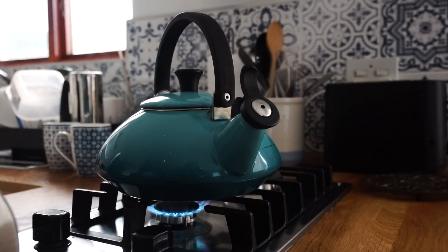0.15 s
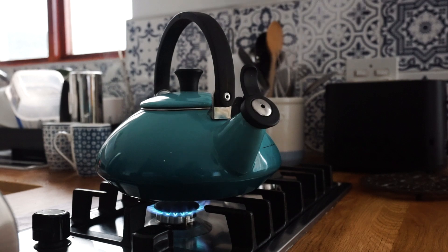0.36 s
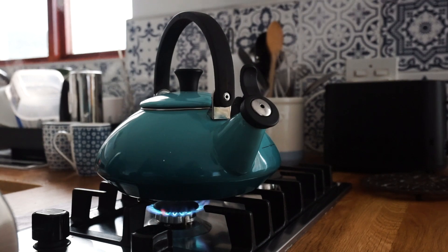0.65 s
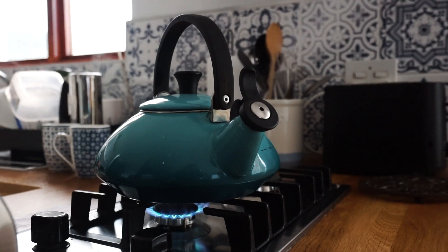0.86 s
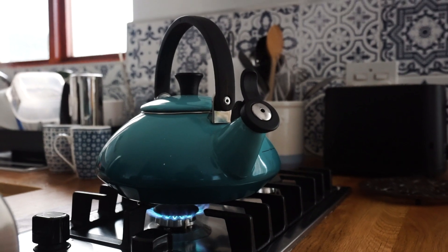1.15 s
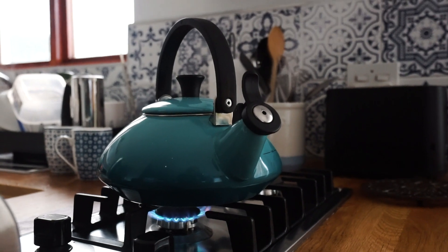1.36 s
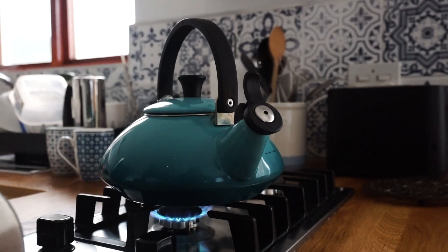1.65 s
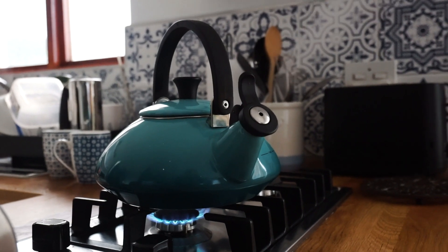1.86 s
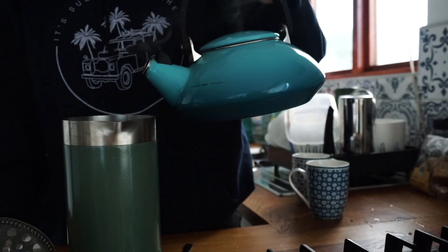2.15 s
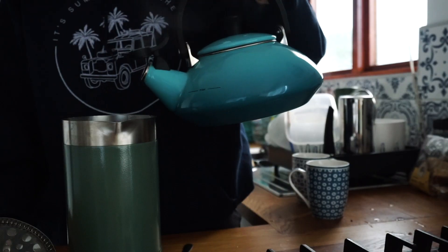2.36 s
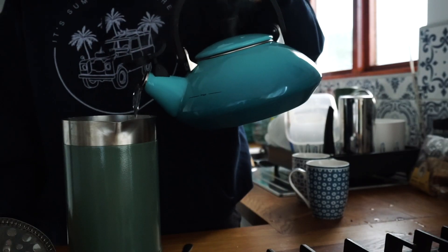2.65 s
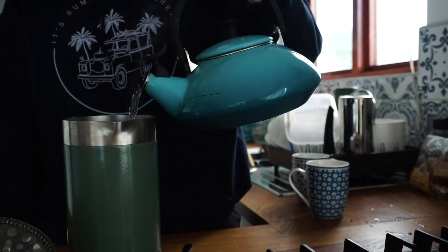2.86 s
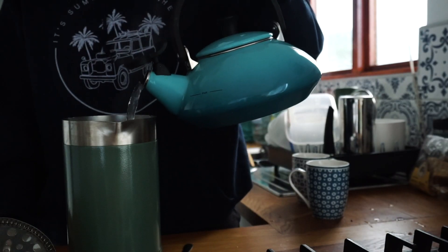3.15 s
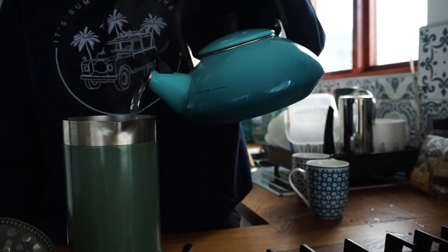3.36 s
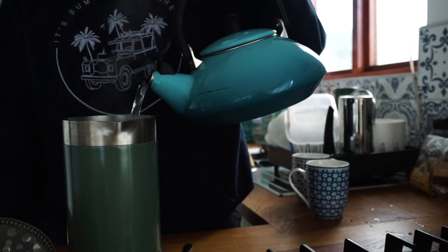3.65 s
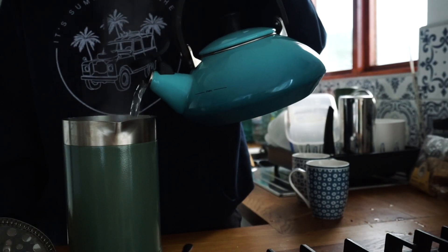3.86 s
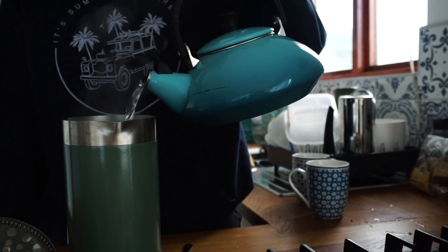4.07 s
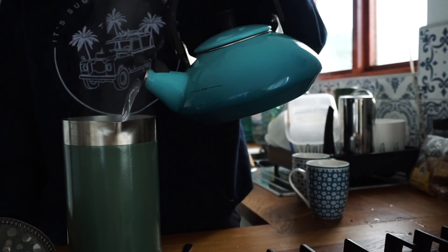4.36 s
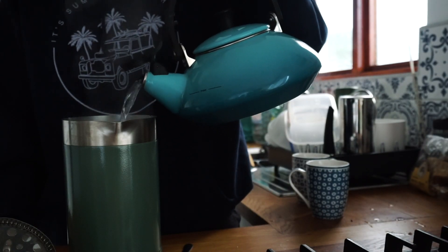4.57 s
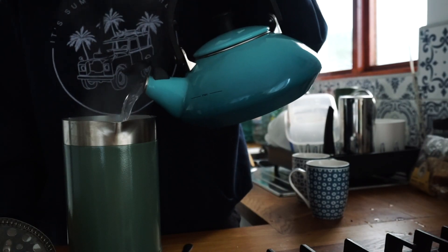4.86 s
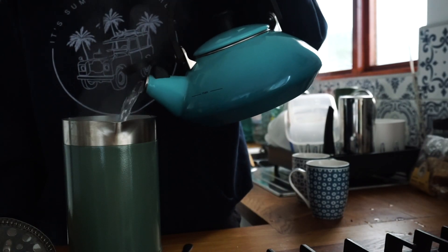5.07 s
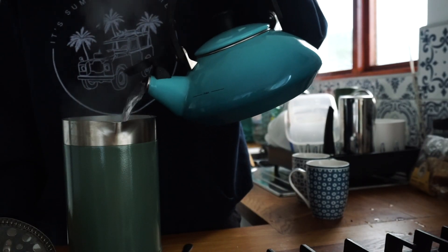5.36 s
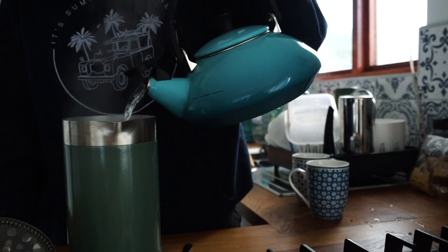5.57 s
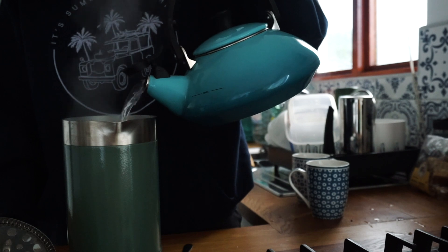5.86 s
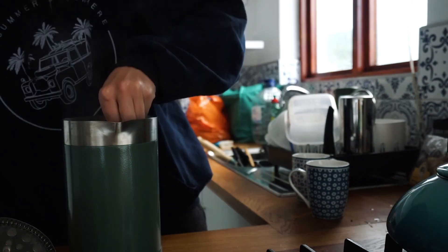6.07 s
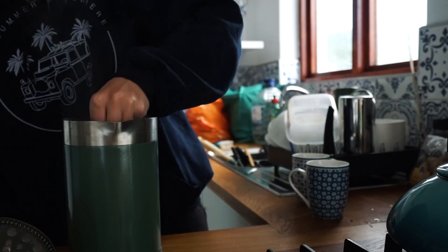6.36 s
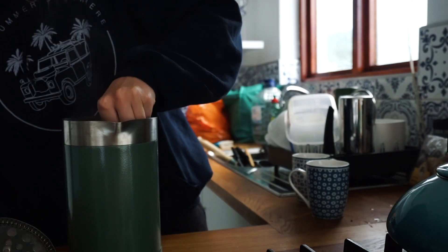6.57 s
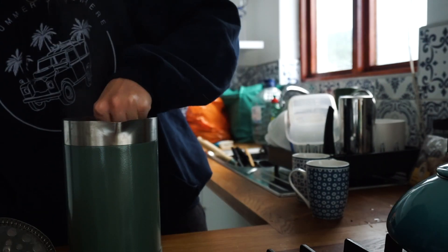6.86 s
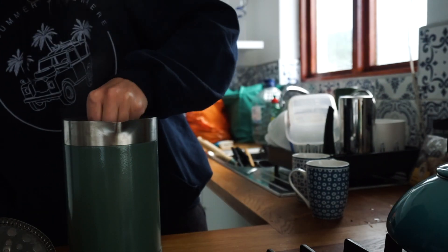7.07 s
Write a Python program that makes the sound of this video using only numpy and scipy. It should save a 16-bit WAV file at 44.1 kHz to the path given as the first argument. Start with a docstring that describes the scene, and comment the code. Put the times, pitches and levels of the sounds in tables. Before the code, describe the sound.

Wavering kettle whistle over steam hiss, turning to a shriek and cutting off, then glugging hot water into a metal flask and sharp stopper clicks.

```python
"""A stovetop kettle whistles over its boil in a tiled kitchen: a wavering jet tone with overtones, over steam hiss.
A second mode breaks in, and its mixing tones with the first make a rough shriek, until the pressure dies.
Hot water then gushes into a steel flask: showers of bubbles, glugs and slaps, coloured by its air column.
Last, the flask's stopper is worked in with sharp clicks, scrapes and dull thuds that ring the steel.
Faint rain, shaped stereo noise, hisses outside throughout."""
import sys
import numpy as np
from scipy import signal
from scipy.fft import rfft, irfft, next_fast_len
from scipy.io import wavfile
from scipy.ndimage import map_coordinates

SR = 44100
rng = np.random.default_rng(int(sys.argv[2]) if len(sys.argv) > 2 else 0)


def generate_wav(sig):
    """Save sig (samples, or channels by samples) to the path in sys.argv[1] as 16-bit PCM at SR."""
    pcm = np.round(np.clip(np.atleast_2d(sig).T, -1, 1) * 32767).astype(np.int16)
    wavfile.write(sys.argv[1], SR, pcm)


N = 318843

# the whistle's first mode, before its random flutter: time_s, pitch_hz
WHISTLE_PITCH = [(0.0, 1330), (0.04, 1376), (0.2, 1255), (0.26, 1308), (0.36, 1270), (0.54, 1260),
                 (0.66, 1310), (0.72, 1266), (0.77, 1338), (0.84, 1320), (0.92, 1271), (1.02, 1283),
                 (1.09, 1401), (1.2, 1345), (1.33, 1352), (1.45, 1397), (1.52, 1364), (1.68, 1437),
                 (1.82, 1490), (1.94, 1482), (2.04, 1457), (2.06, 1408), (2.2, 1379), (2.24, 1310),
                 (2.34, 1367), (2.58, 1397)]
# the kettle's place between the ears: frequency_hz, left_minus_right_db
KETTLE_SIDES = [(300, 0.5), (1300, -3), (2600, -7.5), (4000, -10), (8000, -4), (14000, -13.5)]
# the pour's two main layers: time_s, gurgle_db, splash_db
POUR_LEVELS = [(2.83, -54.5, -60.5), (2.95, -57, -58.5), (3.07, -59, -60), (3.27, -48.5, -51.5),
               (3.49, -62, -53), (3.75, -68.5, -54.5), (4.07, -63, -54.5), (4.25, -55.5, -49),
               (4.41, -52.5, -50.5), (4.57, -51, -46), (5.47, -47.5, -47.5), (5.67, -52.5, -52),
               (6.0, -42.5, -48.5)]
# resonances of the dry steel wall: pitch_hz, width_hz, level_db
DRY_WALL = [(3140, 130, 2), (3180, 69, -1)]

TOP_HZ = 16150  # upper band limit
WHISTLE_END, POUR_START, POUR_END = 2.574, 2.8, 6.015  # s
REST_HZ = 1305.4  # the pitch at an ordinary boil; a harder jet blows sharper
WALL_FADE_DB_PER_S = 27.5  # the wall's ring fades as the water covers it


def amp(db):
    """Decibels to gain."""
    return 10 ** (np.asarray(db) / 20)


def unit(x):
    """x at rms 1."""
    return x / np.sqrt(np.mean(x ** 2) + 1e-20)


def clock(size=N):
    """Seconds at each sample."""
    return np.arange(size) / SR


def along(points, hz):
    """Interpolate (Hz, value) points on a log frequency axis."""
    f, v = np.transpose(points)
    return np.interp(np.log(hz + 1), np.log(f + 1), v)


def curves(rows):
    """One value per sample for each column after the time."""
    s, *cols = np.transpose(rows)
    return [np.interp(clock(), s, c) for c in cols]


def between(start, end, edge):
    """1 from start to end, with ramps edge seconds long centred on both."""
    return np.clip(np.minimum(clock() - start, end - clock()) / edge + .5, 0, 1)


def swell(s, half):
    """A smooth bump of height 1 at s seconds, down to 1/e at half seconds either side."""
    return np.exp(-np.minimum(((clock() - s) / half) ** 2, 50))


def wobble(rate):
    """A smooth random curve, rate knots a second."""
    return map_coordinates(rng.standard_normal(int(N * rate / SR) + 4), [clock() * rate])


def add(track, s, sound):
    """Mix a sound into a track at s seconds."""
    part = track[..., round(s * SR):][..., :sound.shape[-1]]
    part += sound[..., :part.shape[-1]]


def filtered(x, response):
    """x through a complex response, a function of frequency."""
    size = x.shape[-1]
    m = 2 * next_fast_len(size // 2 + 4096)  # even, with room for the filter's tail
    return irfft(rfft(x, m) * response(np.fft.rfftfreq(m, 1 / SR)), m)[..., :size]


def colour(x, spectrum):
    """A causal (minimum-phase) filter through the given (Hz, dB) points."""
    def response(hz):
        # folding the cepstrum onto positive time gives the minimum phase
        cepstrum = irfft(np.log(amp(along(spectrum, hz))))
        cepstrum[1:] *= 2
        cepstrum[len(hz) - 1:] = 0
        return np.exp(rfft(cepstrum))
    return filtered(x, response)


def resonate(x, modes):
    """x through parallel (Hz, width Hz, dB) resonances of alternating sign."""
    def response(f):
        return sum((-1) ** k * amp(db) * 1j * f * width / (centre * centre - f * f + 1j * f * width)
                   for k, (centre, width, db) in enumerate(modes))
    return filtered(x, response)


def diffuse(size=N):
    """Stereo white noise from all around: alike in the bass, far less so in the treble."""
    # frequency_hz, left_right_likeness
    likeness = [(150, 0.98), (500, 0.82), (1200, 0.36), (3000, 0.094), (8000, 0.28)]

    def mid_side(hz):
        turn = np.arccos(np.clip(along(likeness, hz), -1, 1)) / 2
        return np.array([np.cos(turn), np.sin(turn)])
    mid, side = filtered(rng.standard_normal((2, size)), mid_side)
    return np.array([mid + side, mid - side])


def kitchen(x, wet_db, pan=((1000, 0),), lead=.00002, send=None):
    """Direct sound, panned and lead seconds earlier on the left, plus a tiled room's tail (fed by send, if given)."""
    # the room's decay: frequency_hz, t60_s
    decay = [(150, 0.29), (600, 0.51), (2500, 0.44), (6000, 0.43), (15000, 0.21)]
    hz, t, z = signal.stft(diffuse(size=SR // 2), SR, nperseg=256)
    tail = signal.istft(z * amp(-60 * t / along(decay, hz)[:, None]), SR, nperseg=256)[1]
    # the nearest walls answer after a few ms
    tail = tail * np.clip(clock(size=tail.shape[1]) / 0.0026 - .5, 0, 1)
    source = x if send is None else send
    wet = signal.fftconvolve(source[None], tail / np.linalg.norm(tail[0]), axes=1)[:, :len(x)]
    sides = np.array([[.5], [-.5]])  # left, right
    direct = filtered(x, lambda hz: amp(sides * along(pan, hz)) * np.exp(2j * np.pi * hz * sides * lead))
    return (direct + amp(wet_db) * wet) / np.hypot(1, amp(wet_db))


def burst(t60):
    """Half a second holding one dying puff of noise."""
    t = clock(size=SR // 2)
    return rng.standard_normal(len(t)) * amp(-60 * t / t60)


def phase_of(hz, jitter):
    """The phase of a tone whose pitch is roughened by fast random jitter."""
    return 2 * np.pi * np.cumsum(hz * (1 + jitter * wobble(900))) / SR


def rain():
    """Rain outside and the low murmur of the house: shaped diffuse noise at a nearly steady level."""
    # frequency_hz, density_db
    rain_colour = [(15, -50), (25, -27.5), (108, -16.5), (141, -11), (206, -19.5), (229, -16.5),
                   (301, -13.5), (416, -25.5), (575, -20.5), (754, -15.5), (1020, -34.5), (1700, -23),
                   (2000, -27.5), (3200, -32), (13200, -37.5), (16000, -41)]
    return amp(-60.0 + 0.43 * wobble(3.3)) * unit(colour(diffuse(), rain_colour))


def crack(blow, treble_db):
    """A blow in the stopper's colour, always with the same energy."""
    # frequency_hz, density_db
    click_colour = [(40, -38), (90, -18), (135, -10), (270, -15.5), (480, -14.5), (570, -0.5), (830, -9.5),
                    (1350, -5.5), (1700, -0.5), (2080, -2), (2300, -2.5), (2750, -3), (3050, -4),
                    (3400, -7), (4000, -10), (6000, -12.5), (12000, -17.5), (16000, -25)]
    sound = colour(colour(blow, click_colour), [(3000, 0), (7000, treble_db)])
    return sound / np.sqrt(np.sum(sound ** 2) / (SR * 0.00086))


def ringing(modes, scatter_db):
    """Half a second of dying modes; every blow shares its force among them differently."""
    t = clock(size=SR // 2)
    return sum(amp(db + scatter_db * rng.standard_normal() - 60 * t / t60) * np.sin(2 * np.pi * hz * t)
               for hz, db, t60 in modes)


def scrapes():
    """The stopper's thread slips in tiny random jerks, which ring the neck."""
    # scrapes between clicks: time_s, half_length_s, level_db, pitch_hz
    scrape_rows = [(6.395, .016, -49, 1900), (6.462, .014, -45, 2360), (6.71, .02, -58, 1680),
                   (6.872, .025, -48, 2320), (7.12, .013, -48, 1660)]
    out = np.zeros(N)
    for s, half, db, hz in scrape_rows:
        slips = rng.standard_normal(N) * (rng.random(N) < 700 / SR)  # about 700 a second
        out += amp(db) * swell(s, half) * unit(resonate(slips, [(hz, 260, 0), (1100, 400, -9)]))
    return kitchen(out, wet_db=-4.0, lead=.00006)


def stopper():
    """Clicks crack, rattle and ring the stopper, flask and room; thuds add a puff and a trapped-air note."""
    # time_s, level_db, low_ring_hz, low_ring_db, high_ring_hz, high_ring_db, knock_db, treble_db
    click_rows = [(6.1836, -14.5, 1700, -22, 3360, -8.5, -0.5, 1.5),
                  (6.4186, -10.5, 1520, -19, 2420, -10, 0.5, -2.5),
                  (6.6301, -13, 1650, -19, 2850, -10, 1, -0.5),
                  (6.7977, -8, 1730, -22.5, 2290, -10, 1, 0.5),
                  (6.9494, -9.5, 1780, -10, 3600, -9, -6, 2.5),
                  (7.1346, -12, 1820, -2.5, 2600, -22.5, 1.5, 3)]
    # time_s, level_db, hollow_pitch_hz
    thud_rows = [(6.5, -18.5, 500), (6.597, -36.5, 596), (6.897, -21, 590), (7.05, -34, 576)]
    # frequency_hz, density_db
    thud_colour = [(60, -28), (120, -22), (300, -11), (450, -6.5), (580, 4.5), (750, -15), (1050, -6.5),
                   (1500, -14.5), (2500, -20), (5000, -38.5)]
    # the flask's hollow knock, before each click's knock_db: pitch_hz, level_db, t60_s
    knock_modes = [(135.3, -36.5, 0.54), (210.2, -35.5, 0.76), (562, -22, .12), (592, -23, 0.123)]
    # the flask's steel wall, before its common level: pitch_hz, level_db, t60_s
    steel_modes = [(1000, -6, .44), (1340, -8, 0.21), (1647, 3, .28), (1765, -2, 0.19), (1900, -1, .3),
                   (2310, -1.5, 0.3), (2390, -4, .33), (2570, -0.5, .33), (2690, -1, 0.4), (2789, -6, .3),
                   (3450, -16, 0.27), (4150, -15, .26)]
    steel_db, ring_t60 = -29, 0.017  # the steel's long ring; the stopper's short one (s)
    bounce_s, bounce_db = 0.0075, -6.5  # a second landing; its delay varies from click to click
    thud_ring_db, thud_t60 = -8.5, .08  # the trapped air's note (s)
    out, t = np.zeros((2, N)), clock(size=SR // 2)
    for s, db, low_hz, low_db, high_hz, high_db, knock_db, treble_db in click_rows:
        contact = 3.8 * (t == 0)
        snap = contact + burst(t60=0.013) + 0.3 * burst(t60=0.24)
        add(snap, bounce_s * rng.uniform(0.65, 1.3), amp(bounce_db) * burst(t60=0.018))
        ring = ringing([(low_hz, low_db, ring_t60), (high_hz, high_db, ring_t60)], scatter_db=-0.5)
        flask = amp(knock_db) * ringing(knock_modes, scatter_db=4.0)
        flask = flask + amp(steel_db) * ringing(steel_modes, scatter_db=2.5)
        flask = flask * (1 - np.exp(-t / 0.00208))  # the heavy flask takes a moment to swing
        # the room answers the first sharp contact and the stopper's ring; the rattle is heard only directly
        room_feed = crack(contact, treble_db) + ring
        click = kitchen(crack(snap, treble_db) + ring, wet_db=-3.5, pan=[(600, 0.0), (7000, -6.0)],
                        lead=.00007, send=room_feed)
        add(out, s, amp(db) * click)
        add(out, s, amp(db) * kitchen(flask, wet_db=-7.0, lead=.00006))
    for s, db, hz in thud_rows:
        thud = colour(burst(t60=0.084) * (1 - np.exp(-t / 0.0014)), thud_colour)
        note = amp(thud_ring_db - 60 * t / thud_t60) * np.sin(2 * np.pi * hz * t)
        thud = thud / abs(thud).max() + note * (1 - np.exp(-t / 0.0028))
        add(out, s, amp(db) * kitchen(thud, wet_db=-5.0, lead=.00006))
    return out + scrapes()


def bubbles(rate, hz, spread, cycles, size_db, rise):
    """A steady shower of bubbles at rms 1, each a damped sine that rises in pitch."""
    count = int(rate * N / SR)
    start = rng.integers(0, N, count)
    pitch = np.minimum(hz * np.exp(spread * rng.standard_normal((count, 1))), TOP_HZ)
    gain = amp(size_db * np.minimum(rng.exponential(size=(count, 1)), 4))
    turns = pitch * clock(size=int(2 * cycles * SR / hz))
    age = turns / cycles
    rings = gain * np.sin(2 * np.pi * turns * (1 + rise * age / 2)) * amp(-40 * age)
    places = start[:, None] + np.arange(turns.shape[1])
    return unit(np.bincount(places.ravel(), rings.ravel(), N)[:N])


def air_column(x, modes):
    """x twice through the flask's air, for steep flanks; the pitch sways as the surface sloshes."""
    sway = 0.041  # share by which sloshing detunes the air

    def tuned(ratio):
        shifted = [(hz * ratio, width, db) for hz, width, db in modes]
        return resonate(resonate(x, shifted), shifted)
    slosh = np.clip(.5 + .5 * wobble(22), 0, 1)
    return (1 - slosh) * tuned(1 - sway) + slosh * tuned(1 + sway)


def hollow():
    """The empty flask's air sings on under the thin first stream, detuned by sloshing."""
    # time_s, level_db
    hollow_level = [(2.8, -74), (2.87, -59), (3.08, -57), (3.23, -48.5), (3.4, -51.5), (3.5, -57.5),
                    (3.66, -57), (3.8, -66), (3.88, -59.5), (4.15, -68), (4.3, -90)]
    level_db, = curves(hollow_level)
    note = np.sin(phase_of(421 * (1 + 0.0393 * wobble(70)), jitter=0.069))
    return amp(level_db + 1.9 * wobble(55)) * unit(note)


def spray_level(splash_db):
    """Fine spray in dB: it follows the splashing, grows as the water nears the mouth and flares at spatters."""
    # the stream breaks up and spatters: time_s, half_length_s, extra_spray_db
    spatter_rows = [(2.835, 0.049, 6.5), (3.443, 0.16, 9.5), (4.777, 0.025, 5), (5.104, .015, 9.5),
                    (5.247, .03, 7.5), (5.407, 0.034, 6), (5.486, 0.019, 9), (5.91, 0.018, 2)]
    flares = sum(db * swell(s, half) for s, half, db in spatter_rows)
    follow = 0.18 * (splash_db - np.mean(POUR_LEVELS, axis=0)[2])  # dB per dB of splash
    growth = 1.5 * (clock() - (POUR_START + POUR_END) / 2)  # 1.5 dB a second
    return -61 + follow + growth + flares


def spurts():
    """Lumps of water slap the flask and ring its air, and at first its dry wall."""
    # time_s, level_db, treble_db
    spurt_rows = [(2.8058, -43.5, -10), (2.8395, -38, -10), (2.909, -42.5, -33.5), (2.936, -39.5, -24),
                  (2.983, -43, -27), (3.053, -51, -11.5), (3.455, -33.5, -11.5), (3.8705, -38, -5),
                  (4.3792, -38, -11), (4.4343, -34, -21), (4.5198, -41, -31), (4.5559, -33, -34),
                  (4.6225, -29, -26), (4.6874, -32.5, -19), (4.8316, -19.5, -33), (4.886, -42, -23.5),
                  (4.9546, -32, -19), (4.9976, -34, -6), (5.0542, -32.5, -11.5), (5.281, -30, -14.5),
                  (5.3398, -30, 7.5), (5.429, -33.5, -25), (5.571, -31.5, -4), (5.7319, -31.5, -13.5),
                  (5.739, -24.5, -4.5), (5.805, -35.5, -24), (5.9044, -34, -2)]
    # upper air modes of the flask: pitch_hz, width_hz, level_db
    slap_modes = [(1310, 72, 1), (1490, 43, 0), (1994, 110, -7), (2383, 55, 1.5)]
    out = np.zeros(N)
    for s, db, treble_db in spurt_rows:
        slap_colour = [(400, -14.0), (1300, 2.0), (2800, 1.0), (4500, treble_db + 9.0), (16000, treble_db)]
        slap = colour(burst(t60=0.062), slap_colour)
        dry_db = 15.0 - WALL_FADE_DB_PER_S * (s - POUR_START)
        slap = slap + amp(10.5) * resonate(slap, slap_modes) + amp(dry_db) * resonate(slap, DRY_WALL)
        add(out, s, amp(db) * slap / abs(slap).max())
    return out


def glugs():
    """Big bubbles pinch off one by one, each a short note that bends upward."""
    # time_s, level_db, starting_pitch_hz
    glug_rows = [(4.177, -41, 439), (4.242, -41, 430), (4.384, -42.5, 420), (4.493, -38.5, 483),
                 (4.522, -33.5, 450), (4.557, -32, 474), (4.592, -32.5, 450), (4.62, -34.5, 503),
                 (4.649, -38, 470), (4.689, -42, 428), (4.745, -35, 506), (4.772, -35.5, 444),
                 (4.808, -30, 488), (4.837, -42, 433), (4.864, -35, 460), (4.89, -30, 450),
                 (4.924, -36.5, 470), (4.971, -38, 545), (5.008, -30.5, 473), (5.035, -30.5, 474),
                 (5.069, -36, 473), (5.089, -32, 471), (5.152, -35.5, 480), (5.182, -34.5, 467),
                 (5.204, -42, 495), (5.249, -34, 487), (5.28, -30.5, 425), (5.339, -42, 536),
                 (5.372, -33.5, 483), (5.431, -23.5, 480), (5.461, -34, 500), (5.489, -34, 477),
                 (5.524, -37.5, 474), (5.56, -40, 447), (5.618, -35.5, 416), (5.648, -37, 490),
                 (5.735, -34.5, 396), (5.769, -30, 487), (5.81, -37, 490), (5.84, -32, 480),
                 (5.894, -41, 547), (5.962, -34, 471), (5.988, -30, 482)]
    out, t = np.zeros(N), clock(size=SR // 8)
    shape = (1 - np.exp(-t / 0.0032)) * amp(-60 * t / 0.04)  # swell time and t60, s
    for s, db, hz in glug_rows:
        rise = 2.43 * rng.uniform(0, 1.77)  # the pitch climbs by twice this share a second
        note = np.sin(2 * np.pi * hz * t * (1 + rise * t))
        add(out, s, amp(db - 0.5) * shape / shape.max() * note)
    return out


def pour():
    """The stream drives bubbles into the flask, whose upper air resonance is higher late in the pour."""
    # the air column, for each of two passes: pitch_hz, width_hz, level_db
    air_early = [(292, 100, 4), (418, 52, 2)]
    air_late = [(288.4, 43, -0.67), (495, 86, 0.37)]
    # frequency_hz, gain_db
    splash_early = [(500, -4), (760, -11), (880, -8), (1080, -6), (1150, 2), (1230, -1), (1310, -4),
                    (1450, -14), (2000, 2), (2800, -10.5), (3150, 3), (3400, -1), (6000, -23.5)]
    splash_late = [(500, -9.5), (750, -5), (950, -15), (1200, -9), (1320, -2.5), (1520, -2), (1750, -10.5),
                   (2020, -1), (2200, -2), (2380, 1.5), (2700, -8), (3700, -1.5), (6000, -24.5)]
    spray_colour = [(2000, -32), (3500, -1.5), (5000, 1), (7000, 0), (9000, -1.5), (12000, 3),
                    (16000, -1.5)]
    gurgle_db, splash_db = curves(POUR_LEVELS)
    filled = np.clip((clock() - 3.3) / 0.77, 0, 1)  # crossfade from early to late colour

    def blend(early, late):
        return np.sqrt(1 - filled) * unit(early) + np.sqrt(filled) * unit(late)
    big = bubbles(rate=380, hz=425, spread=0.46, cycles=3.3, size_db=2.1, rise=0.091)
    small = bubbles(rate=1100, hz=1700, spread=0.509, cycles=11.6, size_db=3.5, rise=0.11)
    small = small + 0.48 * rng.standard_normal(N)
    drops = bubbles(rate=1300, hz=7000, spread=0.6, cycles=2.0, size_db=3.0, rise=.1)
    drops = drops + .5 * rng.standard_normal(N)
    gush = wobble(45)  # the stream breaks up into lumps
    water = amp(gurgle_db + 2.0 * gush) * blend(air_column(big, air_early), air_column(big, air_late))
    water += hollow()
    # near the end the stream plunges deeper and its low rumble gains 15.5 dB
    deep = np.clip((clock() - 5.21) / 0.39, 0, 1)
    plunge = [(242, 156, 0)]  # pitch_hz, width_hz, level_db for each of two passes
    rumble = unit(resonate(resonate(rng.standard_normal(N), plunge), plunge))
    water += amp(gurgle_db - 17.5 + 15.5 * deep) * rumble
    splash = blend(colour(small, splash_early), colour(small, splash_late))
    water += amp(splash_db + 1.8 * gush + 1.9 * wobble(17)) * splash
    wall_db = -59.5 - WALL_FADE_DB_PER_S * np.maximum(clock() - POUR_START, 0)
    water += amp(wall_db + 2.5 * gush) * unit(resonate(drops, DRY_WALL))
    spray_db = spray_level(splash_db) + 1.8 * gush + 2.44 * wobble(35)
    water += amp(spray_db) * unit(colour(drops, spray_colour))
    water = water * between(POUR_START, POUR_END, edge=0.011) + spurts()
    pan = [(400, -1.5), (6000, -5.5)]  # frequency_hz, left_minus_right_db
    sound = kitchen(water, wet_db=-2.0, pan=pan, lead=.000018)
    sound = sound + kitchen(glugs(), wet_db=-5.0, pan=pan, lead=.000018)
    return sound * between(0, POUR_END, edge=0.0091)


def pressure_db():
    """The steam holds its pressure, then runs down over 0.71 s, to just past the whistle's end."""
    return 20 * np.log10(np.clip((WHISTLE_END + 0.026 - clock()) / 0.71, .001, 1))


def sputter_db():
    """The extra hiss while the jet is turbulent."""
    # spells in which overtones give way to hiss: start_s, end_s, extra_hiss_db
    sputter_rows = [(0.208, 0.256, 12), (0.326, 0.45, 12.5), (0.451, 0.53, 3.5), (0.538, 0.621, 10),
                    (0.67, 0.717, 13), (0.895, 0.998, 10), (1.24, 1.254, 11)]
    return sum(db * between(start, end, edge=0.0045) for start, end, db in sputter_rows)


def shrieking():
    """1 while the second mode sounds, else 0."""
    # start_s, end_s
    shriek_spells = [(1.09, 1.215), (1.46, 2.62)]
    return sum(between(start, end, edge=0.0017) for start, end in shriek_spells)


def overblown():
    """1 while the second mode has jumped free and sings almost alone, else 0."""
    return between(1.858, 1.942, edge=0.0079)


def strained(hz):
    """0 up to 1390 Hz, 1 from 1500 Hz: over this range the second mode takes over from the first."""
    return np.clip((hz - 1390) / (1500 - 1390), 0, 1)


def dip_db():
    """Brief dips in the first mode's level, as dB lost."""
    # time_s, half_length_s, depth_db
    dip_rows = [(0.021, .011, 27), (0.104, 0.01, 10), (0.233, 0.0071, 9), (0.289, .005, 21),
                (0.478, 0.011, 12), (0.629, .004, 20), (0.661, 0.0077, 20.5), (0.686, 0.01, 24),
                (0.742, 0.0057, 22), (0.89, .015, 12.5), (1.015, .009, 7), (1.198, 0.0035, 11),
                (1.235, 0.0036, 24), (1.267, 0.0067, 9), (1.319, 0.007, 10), (1.359, 0.0078, 5),
                (1.461, 0.006, 7.5), (1.613, 0.018, 19), (1.658, .007, 12), (1.823, 0.0068, 4),
                (2.217, .012, 6), (2.309, 0.0048, 14)]
    return sum(db * swell(s, half) for s, half, db in dip_rows)


def stutter():
    """A gain of rms 1 that dips briefly at random, so that the tones flutter."""
    return unit(amp(-3.5 * np.clip(wobble(85), 0, 1.7) ** 2))


def whistle():
    """One mode sings with clean overtones; when the second breaks in, the two mix into a rough shriek."""
    # overtones of the first mode: multiple, level_db
    overtone_rows = [(2, -5), (3, -0.5), (4, -10), (5, -15), (6, -17), (7, -25.5), (8, -35.5)]
    # tones the modes make together: first_multiple, second_multiple, level_db, change_at_full_strain_db
    mixing_rows = [(-1, 1, -24.5, 2), (3, -1, -14, -4), (-2, 2, -14, -0.5), (2, 0, -14.5, -7),
                   (-1, 2, -13, 2), (1, 1, -6.5, 0.5), (3, 0, -12.5, -14), (5, -1, -16.5, -3),
                   (-2, 3, -24.5, 9.5), (0, 2, -18, -1.5), (2, 1, -26.5, -2.5), (4, 0, -20, -7),
                   (1, 2, -22, -4.5)]
    # the spout weakens a band between the overtones: frequency_hz, gain_db
    spout_colour = [(2900, 0), (3080, -6), (3300, -4), (3550, -0.5)]
    hz, = curves(WHISTLE_PITCH)
    rough, free, fall_db, turbulence_db = shrieking(), overblown(), pressure_db(), sputter_db()
    strain = strained(hz)
    first_db = -24 - 8 * strain - 22 * free
    second_db = -27.5 + 1.5 * strain + 2.5 * free
    overtone_db = -30 + 0.067 * (hz - REST_HZ)  # a harder jet is brighter
    # a third mode that only a strained jet sounds
    third = amp(-35 + 2.5 * wobble(80)) * strain * np.sin(phase_of(4090, jitter=0.0159))

    hz = hz * (1 + 0.00542 * wobble(60))  # the jet's speed, and so both pitches, flutter at random
    fray = 0.0038 + 0.0005 * turbulence_db + 0.003 * rough  # turbulence frays the tone
    first = phase_of(hz, jitter=fray)
    second_ratio = 1.75 + 0.028 * strain + .11 * free
    second = phase_of(hz * second_ratio, jitter=0.00936)

    share = np.clip((first_db - second_db + 16.0) / 12, .1, 1)  # mixing weakens as the first mode dies
    mixed = sum(amp(level + change * strain)
                * np.sin(round(a) * first + round(b) * second + 0.16 * wobble(120))
                for a, b, level, change in mixing_rows)
    alone = amp(-8) * np.sin(2 * second) + amp(-20) * np.sin(3 * second)
    shriek = amp(second_db) * stutter() * (np.sin(second) + share * mixed + (1 - share) * alone)

    # turbulence tilts the overtones down and deepens the flutter that each has on its own
    duck_db = 0.45 * turbulence_db
    flutter_db = 2 + 0.088 * turbulence_db
    overtones = sum(amp(level - (k - 2.5) * duck_db + flutter_db * np.log2(k) / 2 * wobble(89.93))
                    * np.sin(round(k) * first) for k, level in overtone_rows)
    tone = amp(first_db - dip_db() + 1.4 * wobble(85)) * np.sin(first)
    tone = tone + (1 - rough) * stutter() * amp(overtone_db) * overtones + rough * (shriek + third)
    falter_db = 3 * (1 - amp(fall_db)) * wobble(75)  # the tones flutter deeper as the pressure dies
    tone = colour(amp(fall_db + falter_db) * tone, spout_colour)
    return kitchen(tone, wet_db=-5.5, pan=KETTLE_SIDES, lead=.00001)


def kettle():
    """The whistle over its steam jet, the rolling boil, a fizz and two spitting drops."""
    # frequency_hz, density_db
    steam_colour = [(300, -16.5), (700, -11), (1000, -10.5), (1700, -1), (2200, -0.5), (2700, -3.5),
                    (3000, -7), (3300, -7.5), (3600, 1), (3950, 7.5), (4700, -1), (6200, -3.5), (9000, -10),
                    (12000, -24.5), (16000, -32.5)]
    boil_colour = [(24, -62), (40, -43), (199, -11.5), (238, 3), (407, -12.5), (475, -10), (534, -14),
                   (721, -6.5), (822, -16.5), (900, -4), (1170, -43.5), (1980, -120)]
    # drops spitting at the kettle: time_s, level_db
    spit_rows = [(1.7648, -24), (1.8484, -0.5)]
    hz, = curves(WHISTLE_PITCH)
    hiss_db = -47.5 + 0.0563 * (hz - REST_HZ) + pressure_db()  # a harder jet hisses more
    hiss_db = hiss_db + sputter_db() + 5 * shrieking() - 3.5 * strained(hz) - 8.5 * overblown()
    hiss = amp(hiss_db + 2.4 * wobble(40.0)) * unit(colour(rng.standard_normal(N), steam_colour))
    boil = amp(-52.0 + 2.66 * wobble(14.33)) * unit(colour(diffuse(), boil_colour))
    # small bubbles and the gas flame
    fizz_colour = [(500, -3), (2000, 3.0), (2700, -5), (3050, -21), (3350, -25), (3800, -5), (5000, -8),
                   (8000, 3.5), (16000, -1.5)]
    fizz = amp(-55.0) * unit(colour(diffuse(), fizz_colour))
    spits = np.zeros(N)
    for s, db in spit_rows:
        tick = colour(burst(t60=0.0042), [(2000, -34), (5000, -12), (8000, -2.0), (16000, 1.5)])
        add(spits, s, amp(db) * tick / abs(tick).max())
    sound = whistle() + kitchen(hiss, wet_db=-2.0, pan=KETTLE_SIDES)
    sound = sound + kitchen(spits, wet_db=-18.0, lead=.00003)
    sound = sound + (boil + fizz) * between(-1, 2.37, edge=0.65)
    return sound * between(-1, WHISTLE_END, edge=0.041)


def scene():
    """Rain behind the stopper, the pour and the kettle."""
    return rain() + stopper() + pour() + kettle()


def record(dry):
    """The recorder weakens the deepest bass and keeps nothing above its band limit."""
    return filtered(colour(dry, [(25, -13), (60, 0)]), lambda hz: hz < TOP_HZ)


dry = scene()
out = record(dry)
generate_wav(out)
```